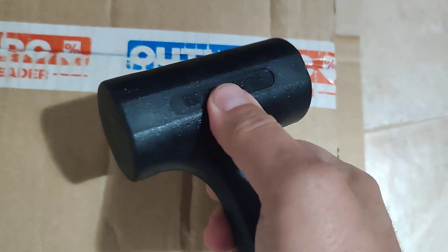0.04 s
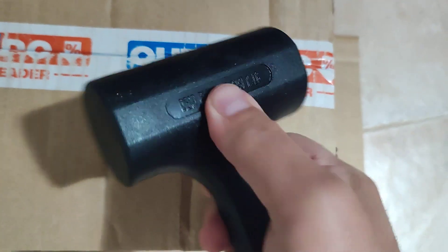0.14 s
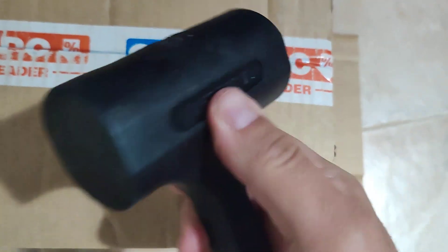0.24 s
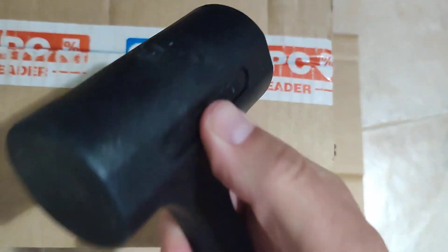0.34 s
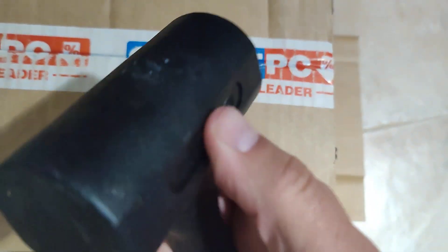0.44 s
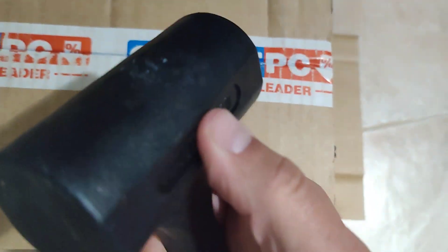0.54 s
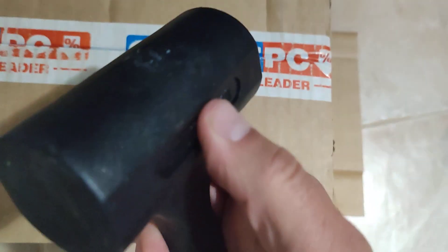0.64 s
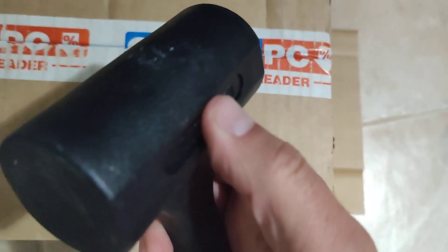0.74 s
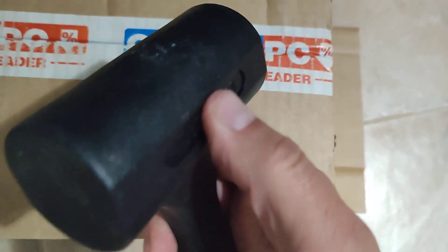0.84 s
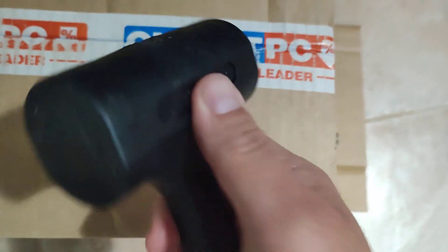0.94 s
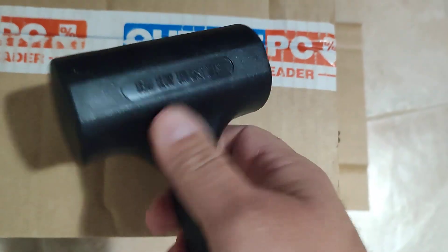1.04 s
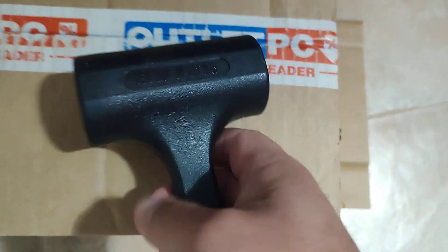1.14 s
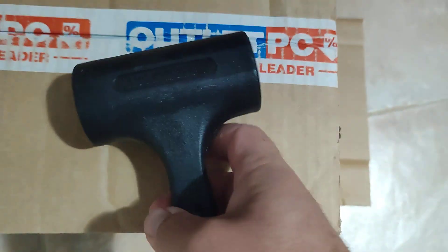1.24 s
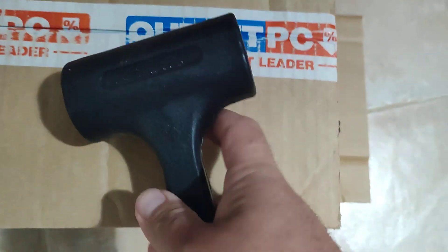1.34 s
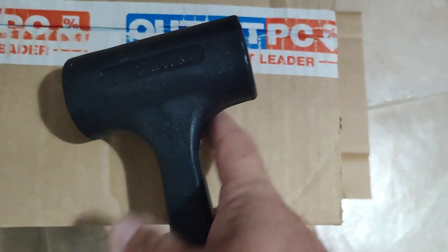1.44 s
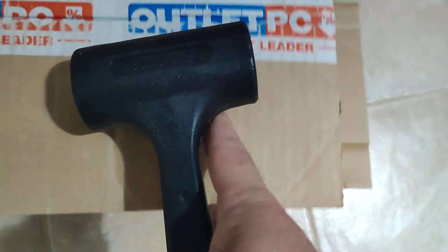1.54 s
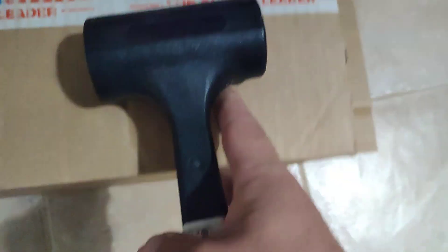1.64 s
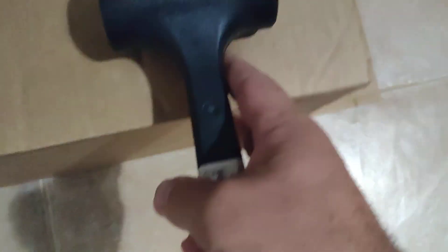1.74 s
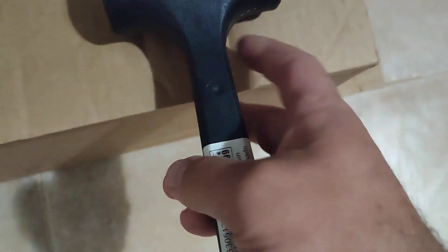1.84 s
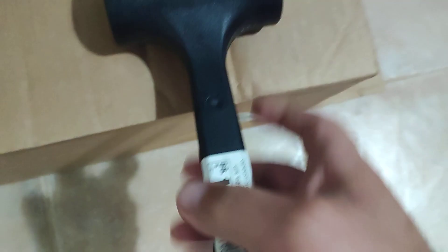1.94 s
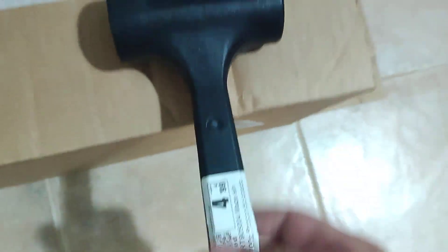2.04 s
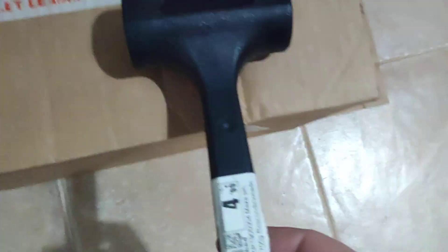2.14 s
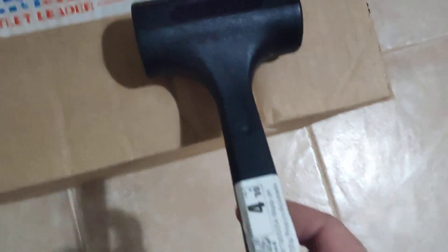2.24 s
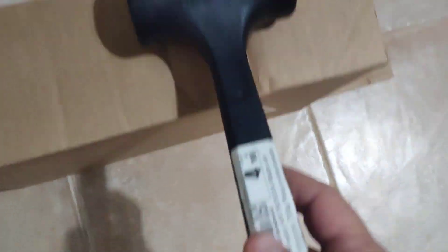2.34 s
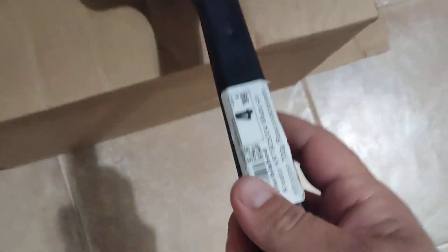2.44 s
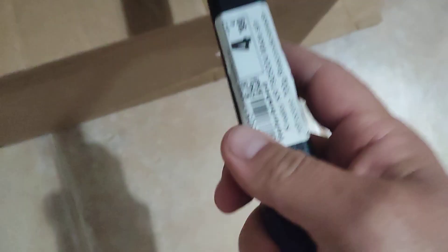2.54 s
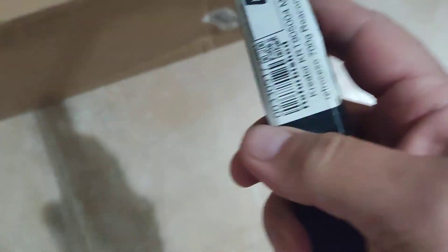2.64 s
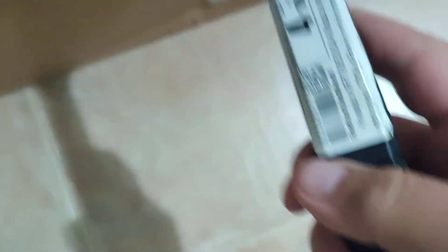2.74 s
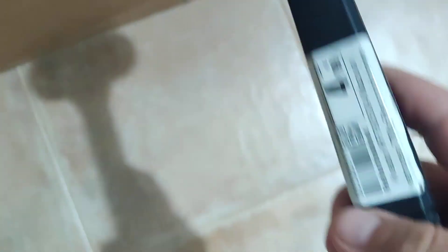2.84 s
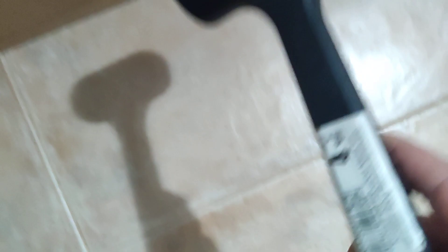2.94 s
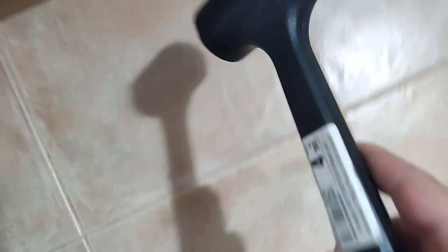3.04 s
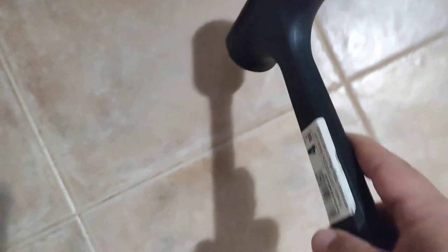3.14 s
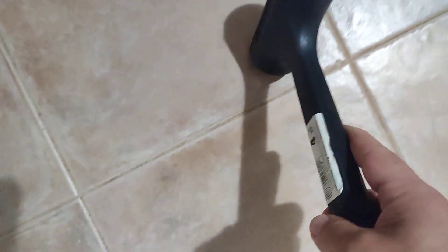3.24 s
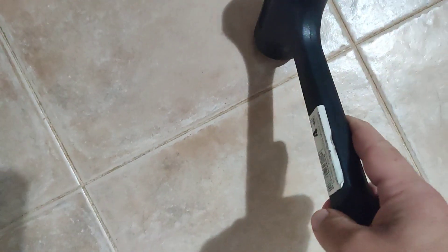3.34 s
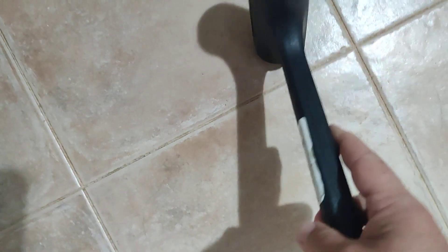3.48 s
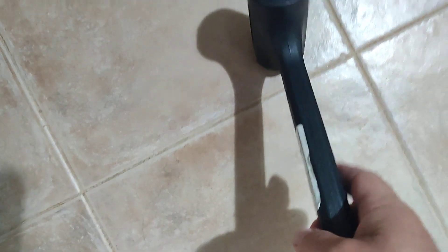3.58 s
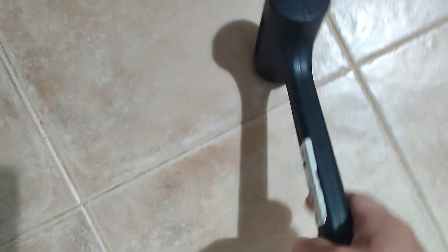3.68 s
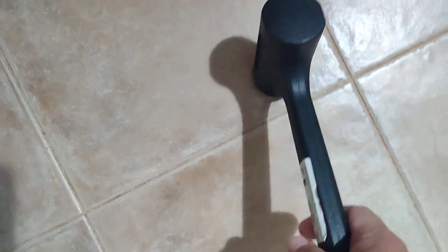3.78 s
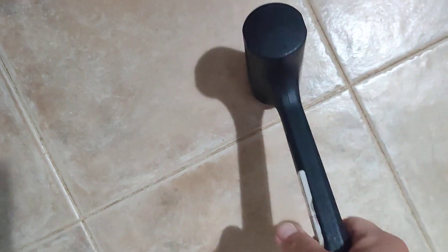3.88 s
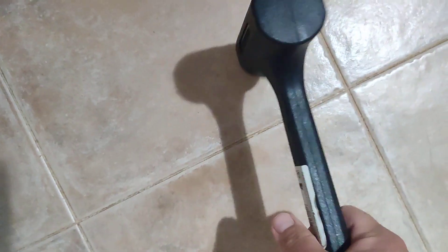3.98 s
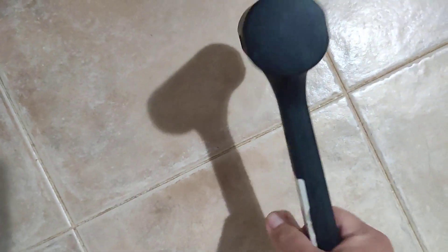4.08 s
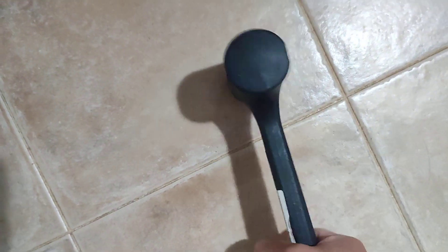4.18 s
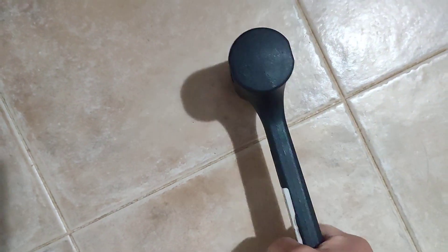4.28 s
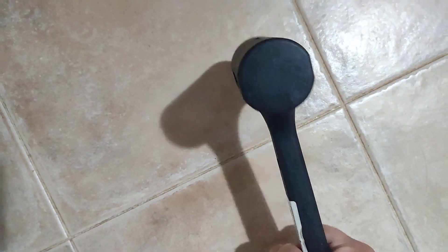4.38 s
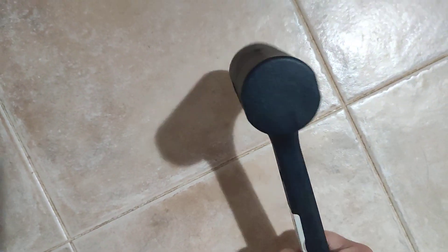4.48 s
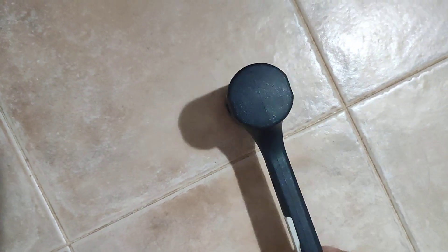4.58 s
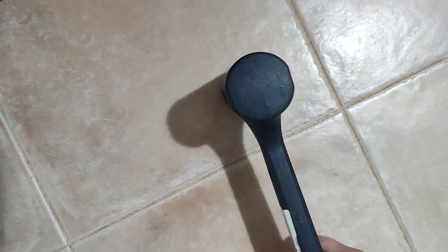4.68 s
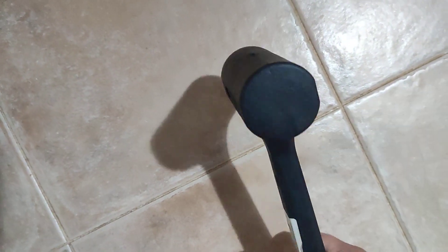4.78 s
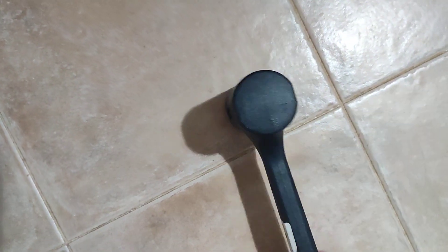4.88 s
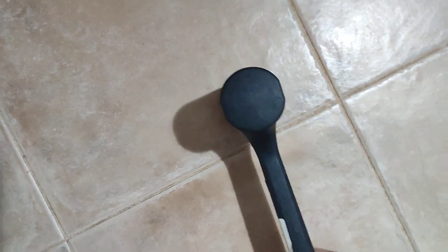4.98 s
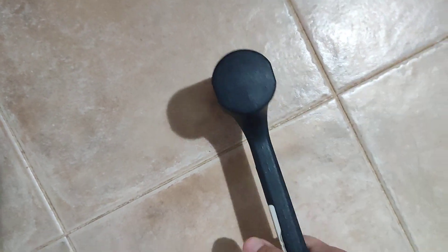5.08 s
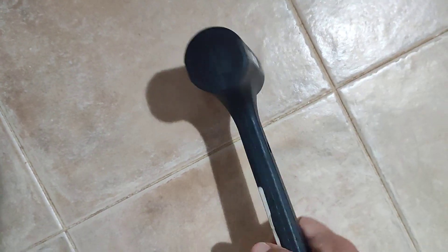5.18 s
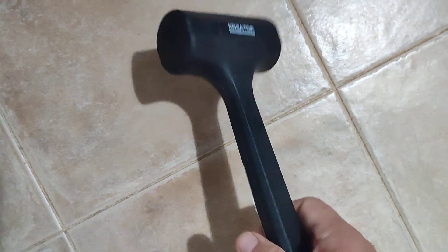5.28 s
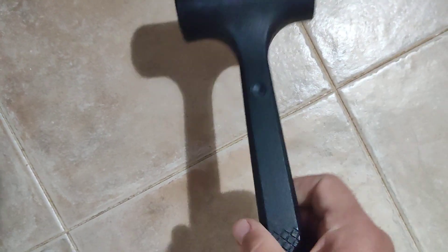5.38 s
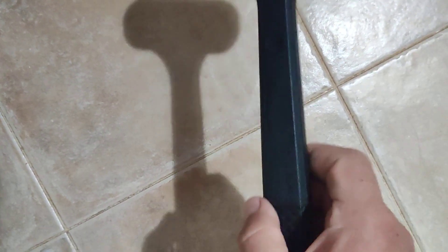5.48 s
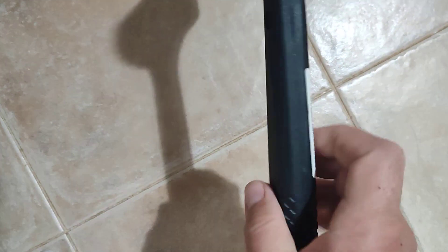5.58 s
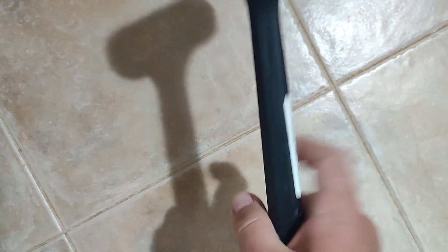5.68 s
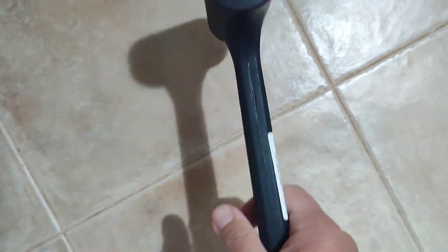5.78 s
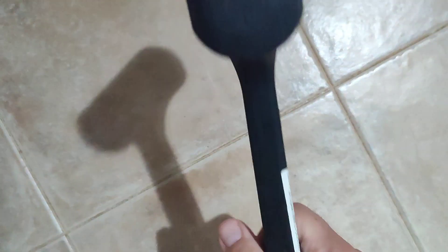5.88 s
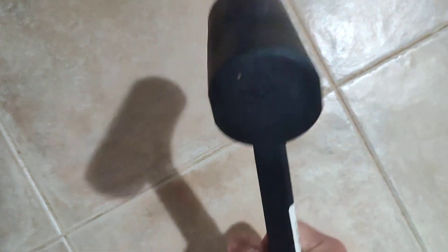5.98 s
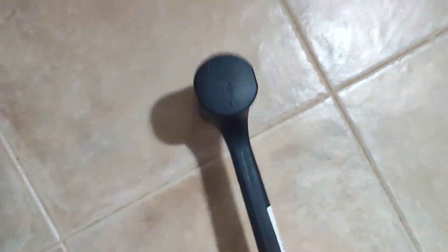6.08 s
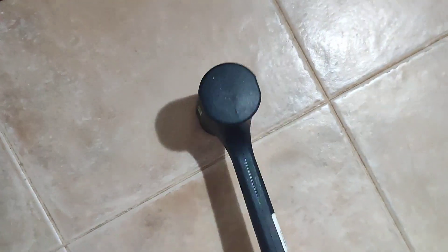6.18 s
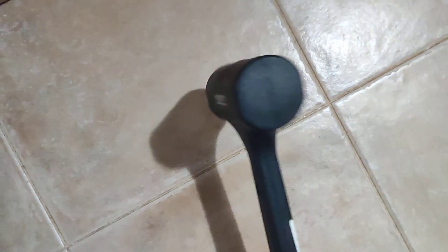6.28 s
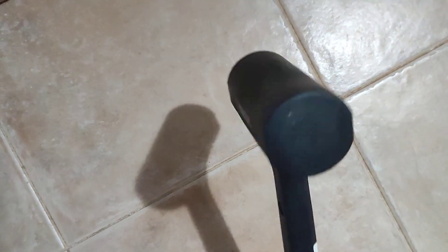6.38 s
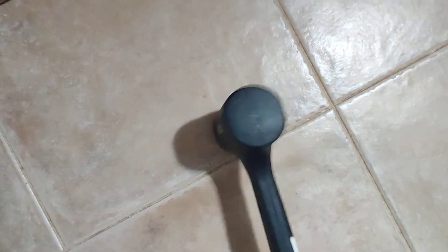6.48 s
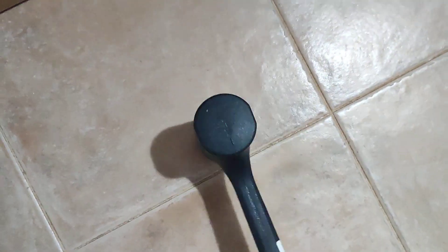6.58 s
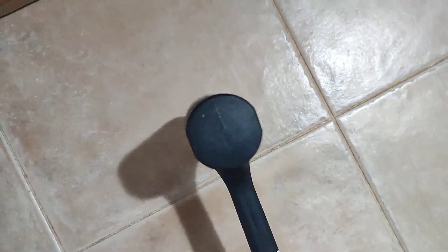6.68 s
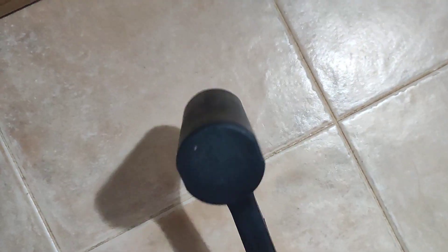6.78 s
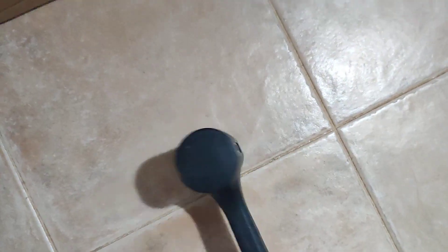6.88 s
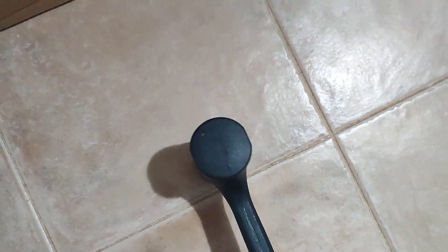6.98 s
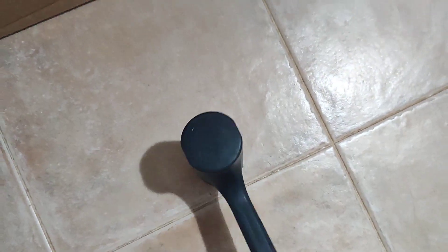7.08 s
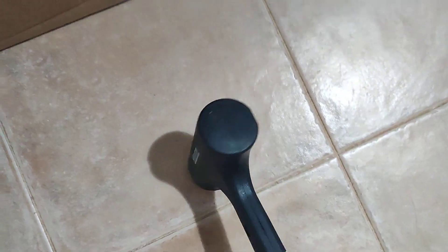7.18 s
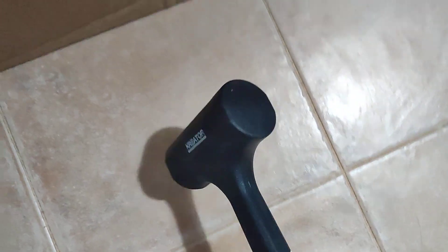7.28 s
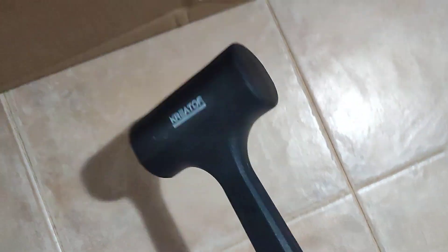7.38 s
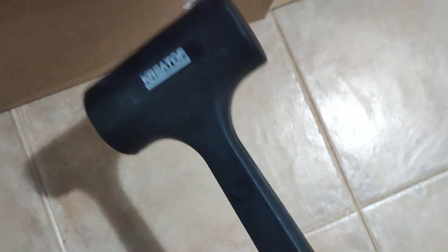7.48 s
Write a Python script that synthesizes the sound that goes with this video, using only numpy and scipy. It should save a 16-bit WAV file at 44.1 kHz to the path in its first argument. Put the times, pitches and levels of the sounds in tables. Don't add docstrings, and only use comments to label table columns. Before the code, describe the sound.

Close indoor sound of a rubber mallet being handled. After a second of quiet room hum, its head bumps softly on a hollow carton and skin hisses faintly along it. Then three firm knocks on floor tile, a pause, and three more, the fourth loudest. Each is a short thud with a crack and a tiny burst of shot inside. A small room echoes; one stereo side is muffled by a finger.

```python
import sys
import numpy as np
from scipy import signal
from scipy.fft import rfft, irfft, next_fast_len
from scipy.io import wavfile
from scipy.ndimage import uniform_filter1d

SR = 44100
rng = np.random.default_rng(int(sys.argv[2]) if len(sys.argv) > 2 else 0)


def waveform_to_disk(signal):
    frames = np.transpose(np.atleast_2d(signal))
    scaled = np.clip(frames, -1, 1) * 32767
    samples = np.round(scaled).astype(np.int16)
    wavfile.write(sys.argv[1], SR, samples)


def voltage_ratio(level):
    return 10 ** (np.asarray(level, float) / 20)


N = 331632
TIME = np.arange(N) / SR


# start_s, level_db, weight_db, crack_db
KNOCK_TIMES = [
    (4.287, -18.5, -3.5, -7),
    (4.646, -16, -10.5, 5),
    (4.962, -17.5, -10, 3),
    (6.186, -13.5, -13.5, -2),
    (6.586, -15, -11, -3),
    (6.971, -19.5, -0.5, -9),
]
# landing_share (0-1), settling_s
SHOT_SETTLING = [(0.7, 0.043), (0.6, 0.031), (0.36, 0.073), (0.72, 0.1), (0.63, 0.072), (0.43, .04)]
# slap_db, loose_shot_db, body_over_weight_db, dull_db (lower part of the crack)
HEAD_FACES = [
    (-9, -31.5, 2, -1.5),
    (-6, -32.5, 0.2, 1),
]
FINGER_GAP = [1, 1, 1.3, 2.2, 1.3, .9]


def knocks(near, spread):
    for k, (start_s, level_db, weight_db, crack_db) in enumerate(KNOCK_TIMES):
        landing, settle_s = SHOT_SETTLING[k]
        slap_db, shot_db, body_db, dull_db = HEAD_FACES[2 * k // len(KNOCK_TIMES)]
        close, far = knock(weight_db, weight_db + body_db, crack_db, landing, slap_db, shot_db, settle_s, dull_db)
        for path, x in ((near, close), (spread, far)):
            add(path[0], start_s, voltage_ratio(level_db + 6.0) * x)
            add(path[1], start_s, voltage_ratio(level_db + 3.0) * covered(x, FINGER_GAP[k]))


# pitch_hz, level_db, t60_s (time to fade by 60 dB)
THUD_NOTES = [(190, 1, 0.059), (250, -8, 0.066), (315.3, -2.5, 0.032)]
BODY_NOTES = [(366, -8.5, 0.018), (480, -8.5, 0.028), (505.5, 7.5, 0.034), (649, 12.5, 0.017)]
RING_NOTES = [(740, -13.5, 0.012), (968, 9.5, 0.023), (980, -17.5, 0.017), (1240, 6, 0.079),
              (1570, -13, 0.037)]
SLAP_NOTES = [(1610, 11.5, 0.01), (1920, -10, 0.0047), (2080, -5, 0.011), (2340, 7, 0.013),
              (2930, 6, 0.00243)]
# pitch_hz, level_db
PORT_TONE = [(1760, -15), (3000, -23.5), (4140, -15.5), (5270, -7), (6090, -9.5), (7530, -5.5), (8700, -17),
             (9450, -39.5), (11700, -21), (13600, -20.5), (15500, -43)]
# pitch_hz, level_db
HISS_TONE = [(290, -31), (500, -6.5), (1180, -0.5), (1370, -6), (4500, -12), (8120, -12.5), (9780, -32),
             (13800, -23), (14600, -34), (15500, -100)]
# pitch_hz, level_db
BASS_LOSS = [(20, -74.5), (130, -20.5), (190, -4.5), (300, 7)]
# low_hz, high_hz, level_db, decay_s
FLOOR_BOOM = (32, 110, -45.5, 0.28)
RUBBER_T60_S = 0.028
LANDING_S = 0.003517
CRACK_LATE_S = 0.00027


def knock(thud_db, body_db, crack_db, landing, slap_db, shot_db, settle_s, dull_db):
    t = np.arange(SR // 2) / SR
    thud = voltage_ratio(thud_db + 3.5) * ring(THUD_NOTES, 0.0012)
    body = voltage_ratio(body_db + 3.0) * ring(damped(BODY_NOTES), 0.00036)
    slap = voltage_ratio(slap_db) * ring(damped(SLAP_NOTES), 0.00012)
    blow = ring(damped(RING_NOTES), 0.00026) + body + slap
    far = voltage_ratio(8.0) * blow * np.exp(-t / 0.00078) + voltage_ratio(4.0) * thud * np.exp(-t / 0.0058)
    close = blow + thud
    add(close, LANDING_S, landing * blow + thud)
    add(close, 2.11 * LANDING_S, 0.48 * (landing * body + thud))

    low_hz, high_hz, boom_db, boom_s = FLOOR_BOOM
    boom = unit(band(rng.standard_normal(len(t)), low_hz, high_hz))
    boom *= (1 - np.exp(-t / 0.0085)) * np.exp(-t / boom_s)

    fade = 0.54 * np.exp(-t / 0.00037) + 0.093 * np.exp(-t / 0.007)
    burst = rng.standard_normal(len(t)) * fade + 1.5 * (t == 0)
    crack = colour(np.roll(burst, int(CRACK_LATE_S * SR)), PORT_TONE)
    crack = colour(crack, [(6200, dull_db), (7400, 0.0044)])
    crack /= np.abs(crack).max()

    shot = unit(colour(grains(len(t), 0.92), HISS_TONE))
    shot *= (1 - np.exp(-t / 0.0046)) * np.exp(-t / settle_s)
    rest = voltage_ratio(boom_db) * boom + voltage_ratio(crack_db + 2.5) * crack + voltage_ratio(shot_db) * shot
    return colour(close, BASS_LOSS) + rest, colour(far, BASS_LOSS) + rest


def damped(modes):
    return [(hz, db, min(t60, RUBBER_T60_S)) for hz, db, t60 in modes]


# start_s, level_db, rise_s, fall_s, brightness_db
HAND_STROKES = [(1.242, -75, 0.0053, 0.044, -23), (1.385, -61.5, 0.04, 0.13, 5.5),
                (1.62, -70, 0.28, 0.12, -6.5), (1.76, -55.5, 0.2, 0.19, 6), (1.88, -61, 0.11, 0.056, -8),
                (2.06, -60.5, 0.14, 0.5, 1), (2.252, -54, 0.092, 0.15, 4),
                (2.47, -60.5, 0.073, 0.037, -1.5), (2.83, -61.5, 0.17, 0.15, -2)]
# start_s, level_db, rise_s, fall_s
SHOT_TRICKLES = [
    (5.103, -66, .006, 0.049),
    (5.478, -81.5, 0.38, 0.095),
    (6.0, -79.5, .1, 0.3),
]
# start_s, level_db, rise_and_fall_s, pitch_hz, width_hz
SHOT_SWISHES = [(5.98, -76, 0.099, 2330, 420), (6.11, -73, 0.081, 2330, 420),
                (7.228, -60.5, 0.016, 3030, 2680), (7.271, -71.5, 0.35, 2800, 2700),
                (7.25, -75, .12, 1419, 700), (7.41, -70.5, 0.17, 1530, 706)]
# pitch_hz, width_hz, level_db
CARTON_NOTES = [(301, 62, 16.5), (888, 31, 0), (1117, 30, -3), (1730, 42, -10), (2290, 70, -22)]
# start_s, end_s, drone_db
CARTON_DRAG = (1.39, 2.6, -59.5)
FINE_DB, COARSE_DB = -2.5, -9.5
OFF_CARTON_DB = -13
DRAG_EASE_DB_S = -6


def sliding():
    skin = colour(grains(N, 3.6), HISS_TONE) * voltage_ratio(0.96 * walk(40))
    fine = band(skin, 6000, 16000)
    coarse = signal.sosfiltfilt(signal.butter(4, 1450, fs=SR, output="sos"), skin)
    middle = skin - fine - coarse
    start_s, end_s, drag_db = CARTON_DRAG
    out, motion = np.zeros((2, N))
    for s, db, rise_s, fall_s, bright_db in HAND_STROKES:
        speed = stroke(s, db, rise_s, fall_s)
        motion += speed
        fine_gain = voltage_ratio(5.0 + FINE_DB + bright_db)
        coarse_gain = voltage_ratio(4.5 + COARSE_DB - bright_db + OFF_CARTON_DB * (s > end_s))
        out += speed * (middle + fine_gain * fine + coarse_gain * coarse)
    out *= voltage_ratio(5.5) / middle.std()
    out += voltage_ratio(10.0) * sum(stroke(*row) for row in SHOT_TRICKLES) * unit(fine)
    for s, db, swell_s, hz, width in SHOT_SWISHES:
        out += voltage_ratio(4.5) * stroke(s, db, swell_s, swell_s) * unit(band(skin, hz - width / 2, hz + width / 2))

    rub = grains(N, 4.7) * voltage_ratio(3 * walk(24.8))
    drone = np.zeros(N)
    for hz, width, db in CARTON_NOTES:
        drone += voltage_ratio(db) * unit(signal.lfilter(*signal.iirpeak(hz, hz / width, SR), rub))
    touching = uniform_filter1d(1. * (TIME > start_s) * (TIME < end_s), SR // 20)
    drag = touching * (voltage_ratio(drag_db + DRAG_EASE_DB_S * (TIME - start_s)) + voltage_ratio(-7.5) * motion)
    drag += sum(stroke(s, db - 14.5, 0.0026, 0.054) for s, db, *_ in HEAD_BUMPS if s < end_s)
    return out + voltage_ratio(0.5) * drag * unit(drone)


def stroke(s, db, rise_s, fall_s):
    away = np.where(TIME < s, (s - TIME) / rise_s, (TIME - s) / fall_s)
    return voltage_ratio(db - 20 * np.minimum(away, 4) ** 1.72)


# start_s, level_db, pitch_hz, t60_s, tick_db
HEAD_BUMPS = [(1.2354, -39, 200, 0.017, -10), (1.242, -29, 250, 0.045, -28), (1.2885, -32, 204, 0.12, -1),
              (1.295, -32.5, 185, 0.04, 7), (1.31, -39.5, 292, 0.2, -20), (1.551, -43, 332, 0.099, -9),
              (1.712, -41, 318, 0.09, -16), (1.867, -45, 214, 0.1, -8), (1.986, -52, 202, 0.12, -10),
              (2.534, -51, 284, 0.12, -25), (3.355, -32.5, 266, 0.055, -9.5), (3.379, -39, 217, 0.068, -11)]
# start_s, level_db, pitch_hz
PHONE_JOLTS = [
    (1.238, -39, 42),
    (1.29, -32, 34.6),
    (1.867, -51.5, 90),
]
FLOOR_OVERTONES_DB = -5


def bumps():
    out, t = np.zeros(N), np.arange(SR // 8) / SR
    for s, db, hz, t60, tick_db in HEAD_BUMPS:
        over = FLOOR_OVERTONES_DB * (s > CARTON_DRAG[1])
        modes = [(hz, 0, t60), (2.22 * hz, over - 7, .035), (2.89 * hz, over - 10, .03), (3.67 * hz, over - 13, .025)]
        add(out, s, -voltage_ratio(db + 2.5) * band(ring(modes, 0.0004), 70, 6000))
        tick = rng.standard_normal(len(t)) * (np.exp(-t / 0.0024) + 0.23 * np.exp(-t / 0.039))
        add(out, s, voltage_ratio(db + tick_db + 5.5) * colour(tick, HISS_TONE))
    for s, db, hz in PHONE_JOLTS:
        add(out, s, voltage_ratio(db + 5.5) * ring([(hz, 0, .15), (2.0 * hz, -4, .12)], 0.0016))
    return out


# start_s, level_db, pitch_hz
SKIN_SNAPS = [(2.0664, -44, 3400), (2.2318, -44, 2200), (2.472, -64, 3050), (2.4894, -50, 3500),
              (2.9072, -51.5, 1070), (6.269, -43, 3160), (6.4777, -80, 5400), (6.4961, -46, 4170)]


def snaps():
    out, t = np.zeros(N), np.arange(SR // 20) / SR
    for s, db, hz in SKIN_SNAPS:
        x = band(rng.standard_normal(len(t)) * np.exp(-t / .003), .5 * hz, 1.7 * hz)
        add(out, s, voltage_ratio(db + 5.0) * x / np.abs(x).max())
    return out


# start_s, level_db, pitch_hz
FINGER_TICKS = [(3.091, -61.5, 713), (3.745, -59.5, 1030), (3.86, -61.5, 738), (3.871, -60, 668),
                (3.885, -60, 1160), (3.89, -52.5, 770), (3.929, -51.5, 770), (3.933, -64, 710),
                (3.991, -65, 452), (3.999, -51.5, 414), (4.031, -50.5, 724), (4.087, -56.5, 888),
                (4.093, -57.5, 724), (4.163, -67, 790), (7.385, -55, 467), (7.39, -51.5, 810),
                (7.417, -56.5, 1310), (7.43, -53.5, 455)]


def finger():
    out = np.zeros(N)
    for s, db, hz in FINGER_TICKS:
        modes = [(hz, 0, .012), (0.312 * hz, -6, .025), (1.48 * hz, -5, .008)]
        push_or_pull = rng.choice([-1, 1])
        add(out, s + 0.00147, voltage_ratio(db + 13.5) * push_or_pull * ring(modes, 0.00028))
    return out


# pitch_hz, loss_db
FINGER_LOSS = [(60, -1), (200, 2.5), (380, 6), (700, 10.5), (1290, 12.5), (2380, 16), (4400, 26),
               (8120, 36), (15000, 24)]


def covered(x, gap=1):
    loss = [(hz * gap ** (hz < 2000), db) for hz, db in FINGER_LOSS if hz * gap < 2300 or hz > 2000]
    return colour(x, loss, -1, lag_s=0.00027)


# pitch_hz, t60_s
ECHO_TIME = [(150, 0.48), (400, 0.51), (1040, 0.39), (2760, 0.38), (7280, 0.32)]
# pitch_hz, level_db
ECHO_LEVEL = [(100, 3), (300, -0.5), (1000, -3), (2200, -1), (4000, -4), (8000, -4.5), (13000, -9.5)]


def room(x):
    t = np.arange(SR) / SR
    a, b = rng.standard_normal((2, SR))
    tail = np.zeros((2, SR))
    for hz in 63 * 2 ** np.arange(0, 8, .5):
        sos = signal.butter(2, [hz / 2 ** .25, hz * 2 ** .25], "band", fs=SR, output="sos")
        alike = np.clip(1.1 - hz / 600, 0, 1)
        t60 = along(ECHO_TIME, hz)
        fade = np.exp(-np.log(1000) * t / t60) * np.clip(t / 0.0036 - .5, 0, 1)
        fade /= np.sqrt(t60 * SR / np.log(1e6))
        ports = [a, alike * a + np.sqrt(1 - alike ** 2) * b]
        tail += voltage_ratio(along(ECHO_LEVEL, hz)) * fade * signal.sosfilt(sos, ports)
    return signal.fftconvolve(x, tail, axes=1)[:, :N]


# pitch_hz, level_db
HUM_TONE = [(12, -55), (32, -2), (92, -9.5), (439, -26), (686, -27.5), (767, -23), (1130, -34.5),
            (4190, -37), (4680, -42), (5230, -39), (6010, -40), (7310, -32.5), (9390, -50.5), (13900, -49),
            (15500, -62)]
# pitch_hz, difference_db
HUM_LEAN = [(60, -0.5), (110, 8.5), (200, 1), (380, -2), (700, 8.5), (1290, 5), (2380, 8), (4400, 8.5),
            (8120, 27.5), (15000, -9.5)]
# pitch_hz, level_db
LAMP_TONES = [(3198, -92.5), (3596, -92), (4597, -101), (4748, -94), (5012, -99), (6395, -87),
              (6600, -87.5), (6799, -99.5), (7197, -74), (7795, -86), (7983, -99), (8010, -90.5),
              (8199, -92.5), (8382, -100)]
# offset_hz, level_db
LAMP_SIDES = [(-48.5, -8), (-26, -22.5), (-9.5, -3), (11.5, -2), (24, -2.5)]
HUM_DB = -61.5


def hum():
    a, b = rng.standard_normal((2, N))
    alike = [(100, 3.5), (300, -8), (650, -11.0)]
    apart = [(60, -1.5), (300, -10.0), (650, -1)]
    left = colour(a, HUM_TONE)
    right = colour(colour(a, alike) + colour(b, apart), HUM_TONE)
    right = colour(right, HUM_LEAN, -0.96, .0004)
    out = voltage_ratio(HUM_DB + 3.0 + 0.7 * walk(4.4)) * np.array([left, right]) / left.std()

    side_level = [(3000, 0.5), (7200, -4), (8400, -33)]  # (Hz, dB)
    whine = np.zeros(N)
    for hz, db in LAMP_TONES:
        waver = voltage_ratio((2.2 if hz > 5500 else 1.8) * walk(5))
        sides = np.zeros(N, complex)
        for off_hz, side_db in LAMP_SIDES:
            drift = 4.2 * walk(0.92)
            sides += voltage_ratio(side_db) * np.exp(1j * (2 * np.pi * off_hz * TIME + drift))
        tone = (1 + voltage_ratio(along(side_level, hz)) * sides) * np.exp(2j * np.pi * hz * TIME)
        whine += voltage_ratio(db + 8.0) * waver * np.imag(tone)
    return out + np.array([whine, covered(whine)])


def ring(modes, push_s, spread=0.02):
    t = np.arange(SR // 2)[:, None] / SR
    hz, db, t60 = np.transpose(modes)
    hz = hz * (1 + spread * rng.standard_normal(len(hz)))
    x = (voltage_ratio(db) * np.sin(2 * np.pi * hz * t) * np.exp(-np.log(1000) * t / t60)).sum(1)
    push = np.sin(np.pi * np.clip(np.arange(SR // 200) / SR / push_s, 0, 1))
    x = np.convolve(x, push)[:len(t)]
    return x / np.abs(x).max()


def grains(size, scatter_db):
    strength = voltage_ratio(scatter_db * np.minimum(rng.exponential(size=size), 5))
    return unit(rng.standard_normal(size) * strength)


def walk(rate):
    k = int(SR / rate)
    steps = np.repeat(rng.standard_normal(N // k + 1), k)
    return 1.3 * uniform_filter1d(uniform_filter1d(steps, k), k)[:N]


def along(table, hz):
    f, v = np.transpose(table)
    return np.interp(np.log(np.maximum(hz, 1)), np.log(f), v)


def colour(x, table, sign=1, lag_s=0.):
    size = next_fast_len(x.shape[-1] + 4096)
    size += size % 2
    hz = np.arange(size // 2 + 1) * SR / size
    cep = irfft(np.log(voltage_ratio(sign * along(table, hz))), size)
    cep[1:size // 2] *= 2
    cep[size // 2 + 1:] = 0
    gain = np.exp(rfft(cep) - 2j * np.pi * hz * lag_s)
    return irfft(rfft(x, size) * gain, size)[..., :x.shape[-1]]


def band(x, lo_hz, hi_hz):
    return signal.sosfilt(signal.butter(2, [lo_hz, hi_hz], "band", fs=SR, output="sos"), x)


def unit(x):
    return x / np.sqrt(np.mean(x ** 2))


def add(track, s, x):
    i = int(s * SR)
    track[i:i + len(x)] += x[:len(track) - i]


def scene():
    hand = bumps() + sliding() + snaps()
    near = np.array([hand, covered(hand, 0.71)])
    spread = near.copy()
    knocks(near, spread)
    out = near + room(spread) + hum()
    out[1] += finger()
    return out


def band_limit(x):
    return signal.sosfilt(signal.butter(12, 15640, fs=SR, output="sos"), x)


# pitch_hz, level_db
MIC_TONE = [(30, -8), (52, -8), (75, 3), (14100, 2.5), (14500, -14.5), (16000, -35)]


def record(dry):
    top = .66
    mix = colour(top * np.tanh(dry / top), MIC_TONE)
    return band_limit(mix)


dry = scene()
out = record(dry)
waveform_to_disk(out)
```